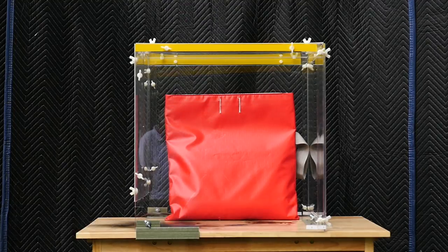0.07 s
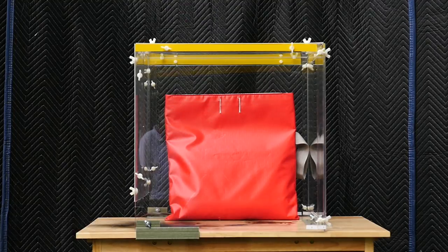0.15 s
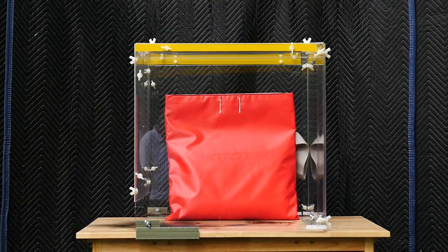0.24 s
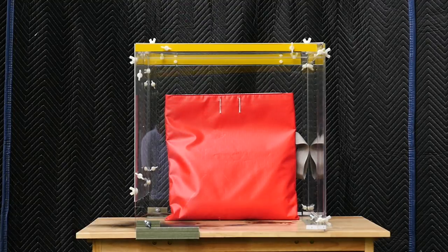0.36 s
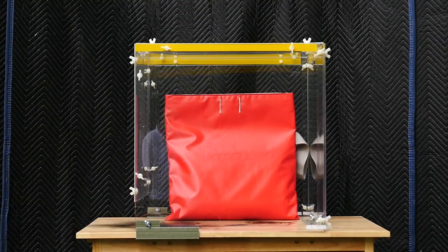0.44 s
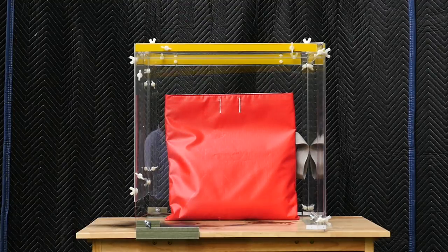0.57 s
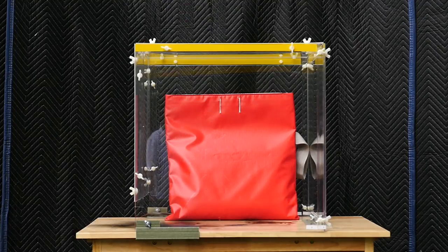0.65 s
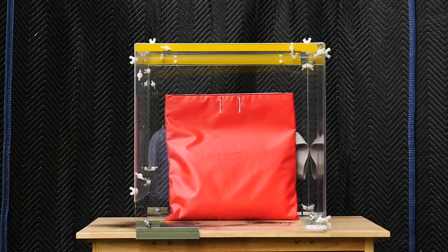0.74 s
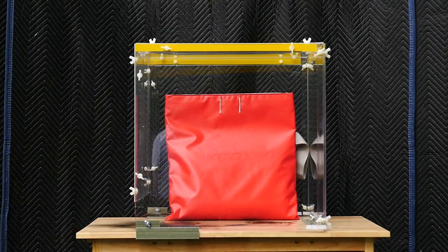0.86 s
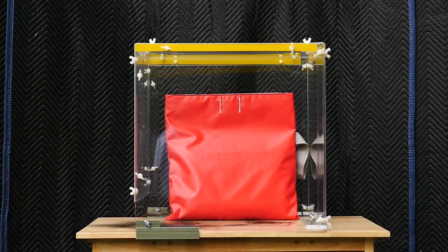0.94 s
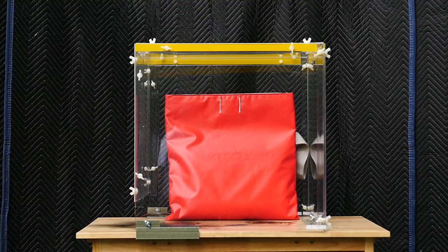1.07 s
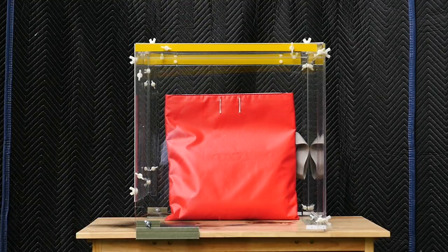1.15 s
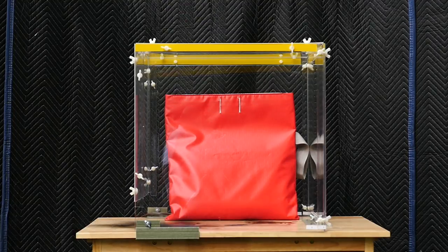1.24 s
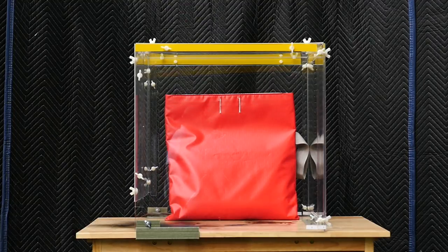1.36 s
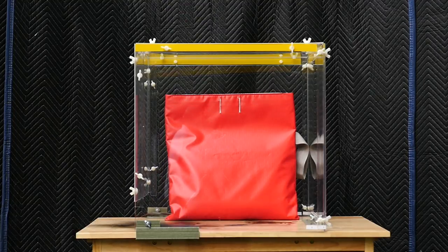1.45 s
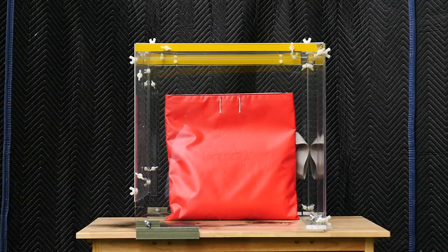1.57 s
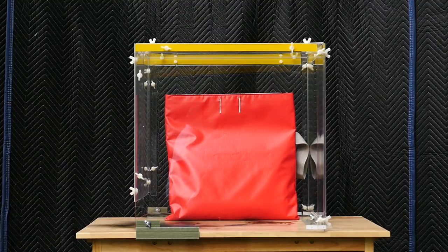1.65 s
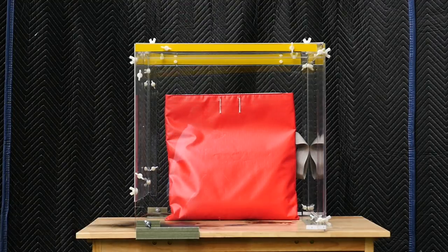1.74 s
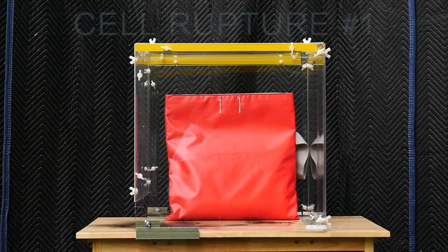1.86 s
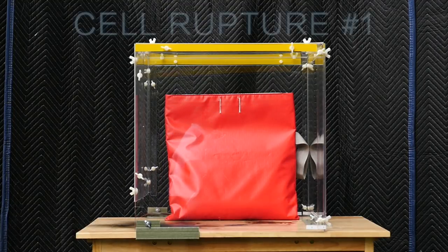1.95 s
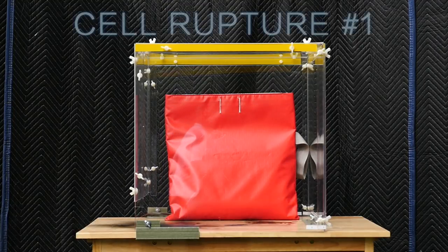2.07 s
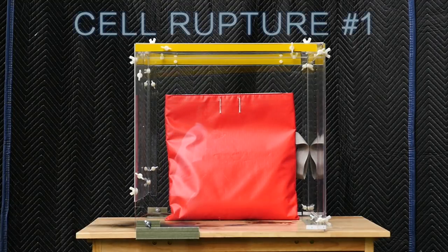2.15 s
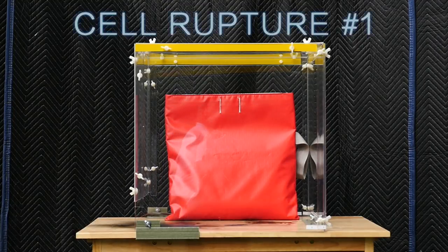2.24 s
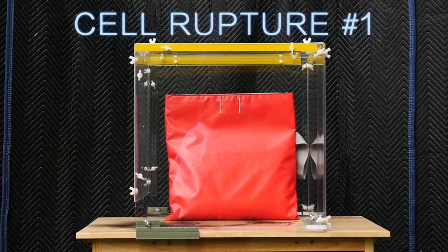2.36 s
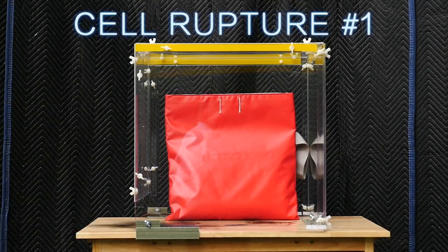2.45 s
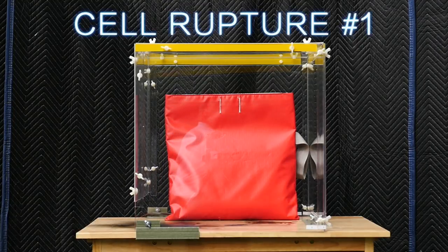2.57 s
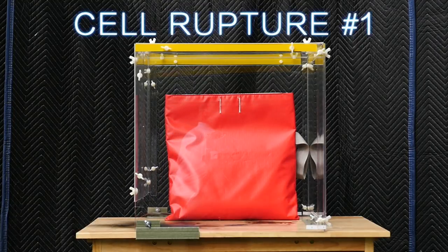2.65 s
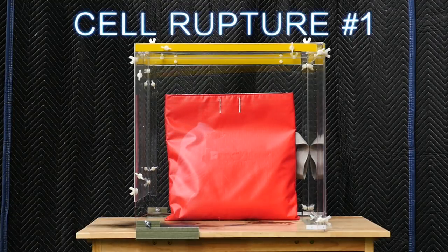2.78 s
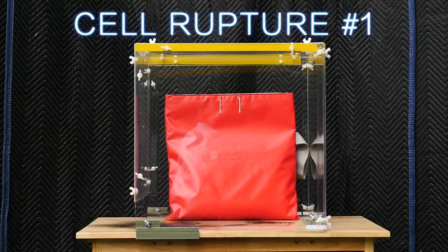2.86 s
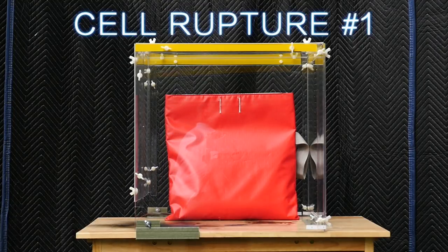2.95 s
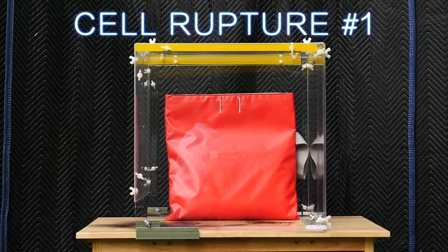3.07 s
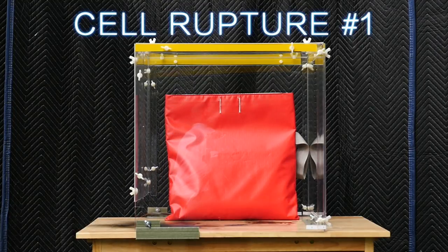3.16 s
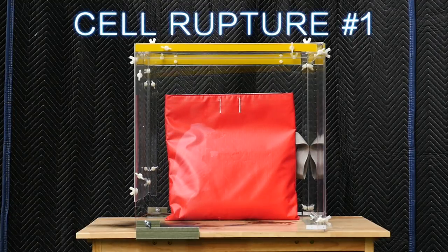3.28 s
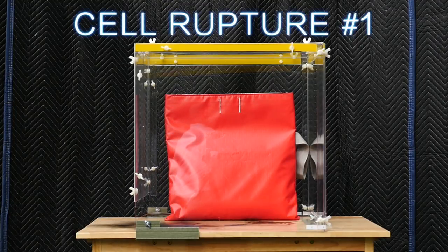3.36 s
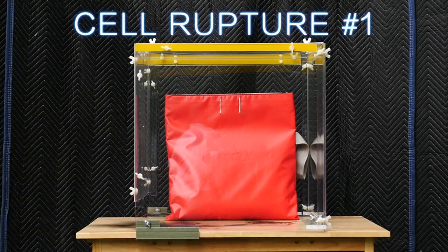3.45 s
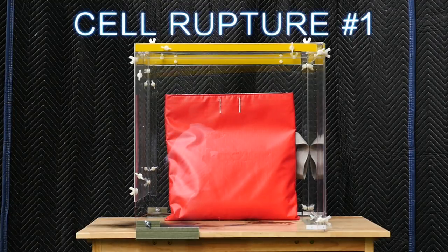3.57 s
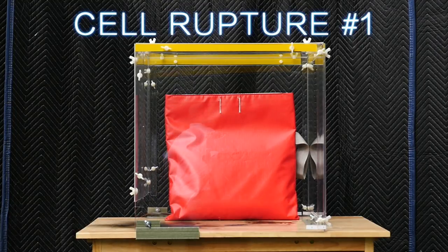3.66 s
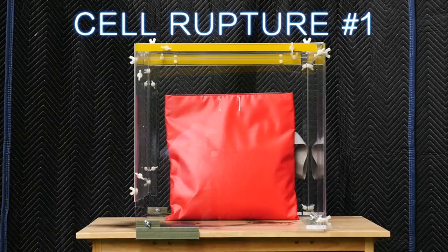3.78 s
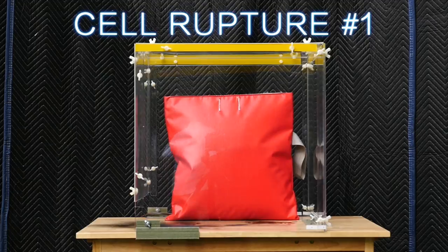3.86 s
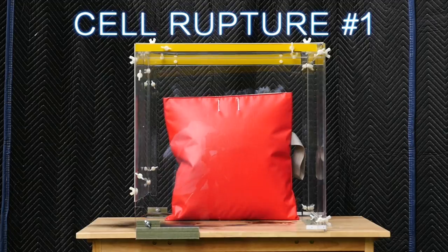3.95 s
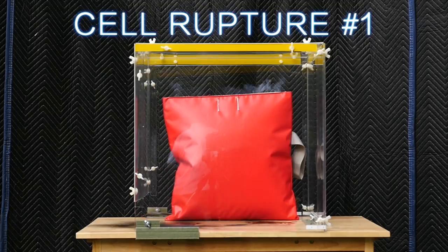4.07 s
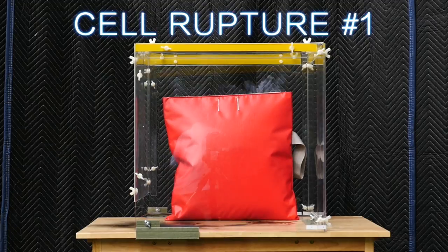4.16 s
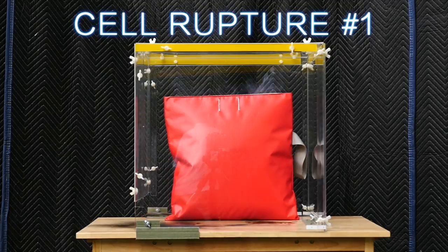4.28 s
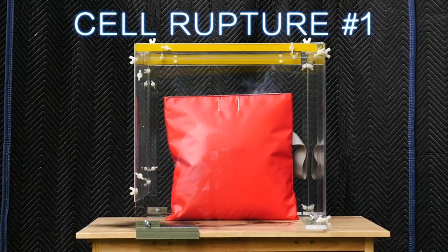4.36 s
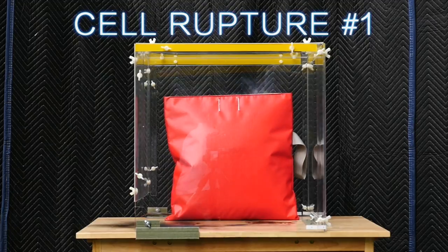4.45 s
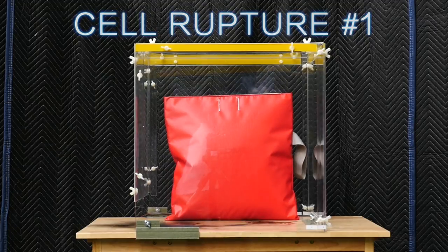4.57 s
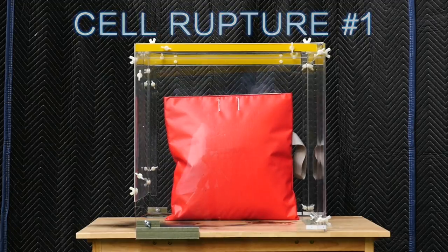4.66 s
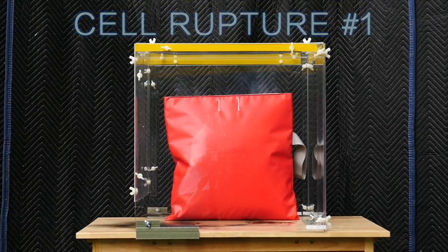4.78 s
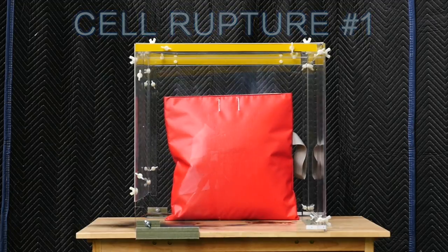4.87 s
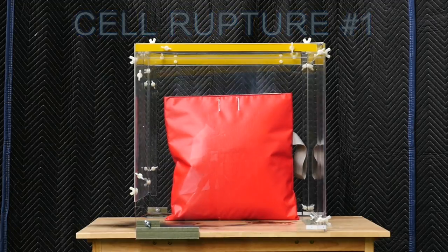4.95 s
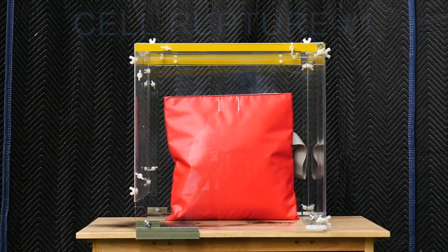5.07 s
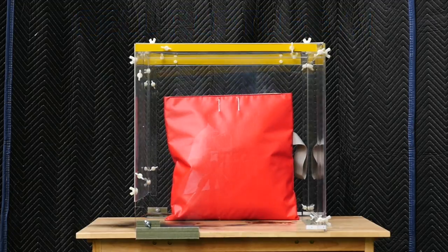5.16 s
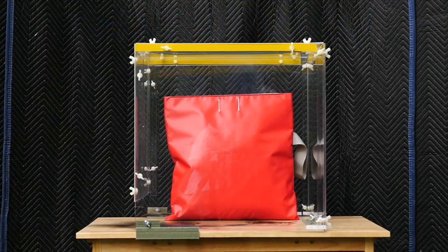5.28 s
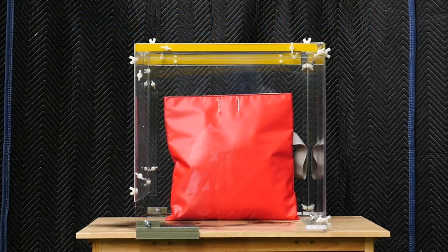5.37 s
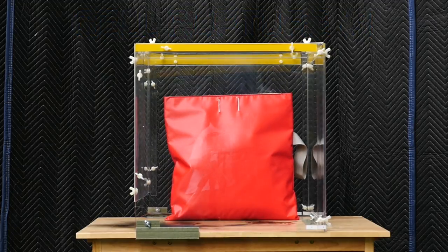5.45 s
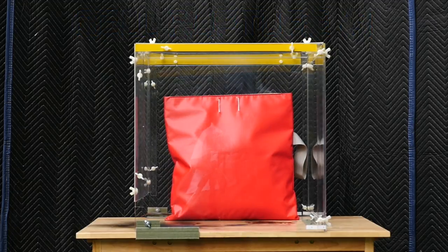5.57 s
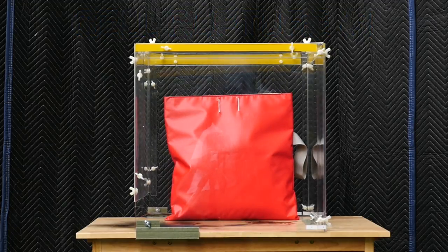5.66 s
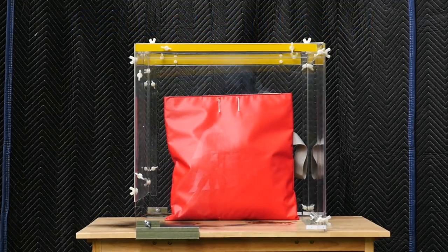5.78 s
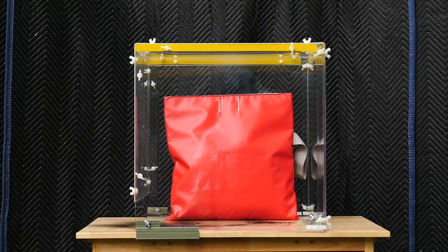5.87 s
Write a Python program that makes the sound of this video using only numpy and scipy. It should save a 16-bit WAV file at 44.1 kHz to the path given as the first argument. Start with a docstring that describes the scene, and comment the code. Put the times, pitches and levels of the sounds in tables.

```python
"""A battery cell bursts inside a fabric bag in a plastic test box: a rising hiss, one pop, then sputtering gas.
The gas is shaped noise that follows a flow curve; its puffs thump the bag and ring a drifting hollow tone.
The pop is a hard shove with a blast of noise; it overloads the recorder, whose gain ducks and creeps back.
Before and around it are dry ticks and a distant machine's hum, with gliding bird notes in echoes,
one bird far and one nearer, and faint insects made of narrow bands of noise."""
import sys
import numpy as np
from scipy import signal
from scipy.fft import rfft, irfft, next_fast_len
from scipy.io import wavfile
from scipy.ndimage import uniform_filter1d, map_coordinates

SR = 44100
rng = np.random.default_rng(int(sys.argv[2]) if len(sys.argv) > 2 else 0)


def wrap_up_sound(samples):
    """Save the sound to the file named by the first command line argument, as 16-bit audio."""
    columns = np.atleast_2d(samples).T
    # keep every value between -1 and 1, then stretch to whole-number steps
    tamed = np.clip(columns, -1, 1)
    steps = np.round(tamed * 32767).astype(np.int16)
    wavfile.write(sys.argv[1], SR, steps)


N = 261072
T = np.arange(N) / SR  # seconds


def amp(db):
    """Decibels to gain."""
    return 10 ** (np.asarray(db) / 20)


def unit(x):
    """Scaled to rms 1."""
    return x / np.sqrt(np.mean(x ** 2) + 1e-20)


def span(start_s, end_s):
    """The samples between two times."""
    return slice(int(start_s * SR), int(end_s * SR))


def wobble(rate):
    """A smooth random curve through rate random knots a second."""
    knots = rng.standard_normal(int(N * rate / SR) + 4)
    return map_coordinates(knots, [T * rate])


def filtered(x, response):
    """x times a response of frequency, padded so the end does not wrap round to the start."""
    m = next_fast_len(N + SR // 2)
    return irfft(rfft(x, m) * response(np.fft.rfftfreq(m, 1 / SR)), m)[:N]


def noise(spectrum):
    """Noise of rms 1 with a spectrum of (Hz, relative dB) points."""
    f, db = np.transpose(spectrum)

    def response(hz):
        return amp(np.interp(np.log(hz + 1), np.log(f), db))

    return unit(filtered(rng.standard_normal(N), response))


def narrow(centre_hz, half_width_hz):
    """A fuzzy tone of rms 1: noise through one resonance, at half amplitude half_width_hz off centre."""
    return unit(filtered(rng.standard_normal(N), lambda hz: 1 / (1 + ((hz - centre_hz) / half_width_hz) ** 2)))


def wavering(centre_hz, spread_hz, rate, flicker_db):
    """A tone of rms 1 whose pitch and strength drift through rate random knots a second."""
    phase = 2 * np.pi * np.cumsum(centre_hz + spread_hz * wobble(rate)) / SR
    return unit(np.sin(phase) * amp(flicker_db * wobble(rate)))


def echoes(x, t60, wet_db):
    """x plus a dense tail of reflections that falls 60 dB in t60 seconds."""
    t = T[:SR]
    tail = rng.standard_normal(len(t)) * amp(-60 * t / t60)
    return x + amp(wet_db) * signal.fftconvolve(x, tail / np.linalg.norm(tail))[:N]


def note(s, length, start_hz, end_hz, db, depth_hz=0):
    """One gliding bird note that starts quickly, with an optional fast sawtooth trill in its pitch."""
    out, now = np.zeros(N), span(s, s + length)
    age = T[now] - s
    u = np.clip(age / length, 0, 1)
    glide = start_hz + (end_hz - start_hz) * np.sin(u * np.pi / 2)
    pitch = glide + depth_hz * signal.sawtooth(2 * np.pi * 58 * age, .8)
    envelope = np.tanh(10 * u) * np.sqrt(1 - u)
    out[now] = amp(db) * envelope * np.sin(2 * np.pi * np.cumsum(pitch) / SR)
    return out


# Spectrum of the outdoor air at the microphone. Each row: frequency in Hz, relative level in dB.
AIR_SPECTRUM = [(18, -45.5), (35, -14), (55, -8.5), (75, -3), (98, -10.5), (125, -9), (190, -16.5),
                (260, -16), (300, -23.5), (380, -22.5), (560, -27.5), (1100, -28.5), (3200, -43),
                (6000, -48.5), (15500, -51)]
# Steady hums above the distant machine's drone. Each row: frequency in Hz, width in Hz, level in dB.
STEADY_HUMS = [(118.7, 16, -50), (248.4, 4.1, -63), (357.3, 2.8, -57.5), (388, 22, -63)]
# Brief swells of the low hum. Each row: centre in seconds, half length in seconds, level in dB.
HUM_SWELLS = [(0.602, 0.018, -31), (1.057, 0.082, -30.5)]
DRONE_DB, DRONE_SWAY_DB = -39.5, 1.4  # the drone's middle level and its slow unsteadiness


def background():
    """Outdoor air as shaped noise, with a distant machine's wavering drone and its steady hums."""
    sway = amp(DRONE_DB + DRONE_SWAY_DB * wobble(8))
    drone = sway * wavering(70, spread_hz=6.77, rate=30, flicker_db=5.0)
    swell = sum(amp(db) * np.exp(-((T - s) / half) ** 2) for s, half, db in HUM_SWELLS)
    swells = swell * wavering(60.5, spread_hz=6.6, rate=30, flicker_db=4.0)
    hums = sum(amp(db) * narrow(hz, width / 2) for hz, width, db in STEADY_HUMS)
    return amp(-43.0) * noise(AIR_SPECTRUM) + drone + swells + hums


BOUT_START_S, BOUT_EVERY_S, BOUT_S = 1.05, 2.12, 1.4  # one bout's start, the repeat time and the length


def insects():
    """High narrow noise bands: one insect chirps in loose pulses, one trills in bouts, a chorus stays behind."""
    cycle = 5.6 * T + .2 * wobble(3)  # about 5.6 pulses a second
    pulse = (.5 + .5 * np.cos(2 * np.pi * cycle)) ** 2 * amp(2 * wobble(6))
    chirps = amp(-74.5) * (0.58 + pulse) * narrow(9560, 160)
    in_bout = 1. * ((T - BOUT_START_S) % BOUT_EVERY_S < BOUT_S)
    trill = amp(-77) * uniform_filter1d(in_bout, size=4000) * narrow(8742, 55)
    chorus = amp(-73) * narrow(7800, 500)
    return chirps + trill + chorus


# A far bird's trilled notes. Each row: start in seconds, length in seconds, level in dB before lift and echoes.
SONG_NOTES = [(0.609, 0.085, -55.5), (0.916, .12, -54), (1.189, 0.098, -52.5)]
# Its soft rising chips after the song. Each row: start in seconds, level in dB before lift and echoes.
SONG_CHIPS = [(2.04, -64), (2.369, -64.5), (2.702, -66), (3.015, -65), (3.36, -70)]
# Spectrum of the buzz after its last trilled note. Each row: frequency in Hz, relative level in dB.
BUZZ_SPECTRUM = [(2600, -32), (3200, 2.5), (4200, -4), (4700, 1.5), (5100, -2), (5500, -15), (6500, -28)]
SONG_HZ, SONG_RISE_HZ, SONG_TRILL_DEPTH_HZ = 2867, 190, 115
# a soft low note leads into each repeat
GRACE_LEAD_S, GRACE_S, GRACE_HZ, GRACE_DRY_DB = 0.044, .083, 2110, -62.5
CHIP_S, CHIP_FROM_HZ, CHIP_TO_HZ, CHIP_TRILL_DEPTH_HZ = .052, 3190, 3410, 75
BUZZ_DELAY_S, BUZZ_ATTACK_S, BUZZ_HOLD_S = .1, 0.03, 0.58  # delay from the last note's start
BUZZ_DRY_DB, BUZZ_FADE_DB_PER_S = -63.5, 150


def far_bird():
    """Three trilled notes, a buzz of pulsing noise and then soft, regular chips, all in strong echoes."""
    song_end_hz = SONG_HZ + SONG_RISE_HZ
    trills = sum(note(s, length, SONG_HZ, song_end_hz, db, SONG_TRILL_DEPTH_HZ) for s, length, db in SONG_NOTES)
    graces = sum(note(s - GRACE_LEAD_S, GRACE_S, GRACE_HZ, GRACE_HZ, GRACE_DRY_DB, depth_hz=20)
                 for s, _, _ in SONG_NOTES[1:])
    chips = sum(note(s, CHIP_S, CHIP_FROM_HZ, CHIP_TO_HZ, db, CHIP_TRILL_DEPTH_HZ) for s, db in SONG_CHIPS)
    age = T - SONG_NOTES[-1][0] - BUZZ_DELAY_S
    fading_s = np.maximum(age - BUZZ_ATTACK_S - BUZZ_HOLD_S, 0)
    swell = np.clip(age / BUZZ_ATTACK_S, 0, 1) * amp(-BUZZ_FADE_DB_PER_S * fading_s)
    pulsing = 1 + 0.34 * np.sin(2 * np.pi * 48 * T)
    buzz = amp(BUZZ_DRY_DB) * swell * noise(BUZZ_SPECTRUM) * pulsing
    song = amp(3.5) * (trills + graces + chips) + buzz
    return echoes(song, t60=.85, wet_db=1)


# Ticks of the warming cell and bag.
# Each row: start in seconds, level in dB before the body's lift, brightness in dB (snap against knock).
CELL_TICKS = [(2.637, -37.5, -15.5), (2.644, -60, -1), (2.656, -50, -10), (3.442, -49, -7),
              (3.527, -52, 2.5), (3.568, -62, 7), (3.603, -52, -8.5), (4.166, -41.5, 4), (5.765, -57, 4)]


def ticks():
    """Small dry ticks, each a dull knock and a bright snap of noise under one abrupt, fading envelope."""
    knock, snap = np.zeros(N), np.zeros(N)
    for s, db, bright_db in CELL_TICKS:
        age = np.abs(T - s)
        crack, tail = amp(-60 * age / 0.011), 0.51 * amp(-60 * age / 0.14)
        fade = (T >= s) * amp(db) * (crack + tail)
        knock += fade
        snap += fade * amp(bright_db)
    body = noise([(80, -9.5), (300, 12.5), (900, -7), (2000, -43), (6000, -46.0)])
    bright = noise([(1000, -15.5), (3000, 0.0), (4500, -3), (7000, -13.5), (12000, -27.5)])
    return amp(3) * knock * body + snap * bright


# The gas flow leaks, surges as the cell bursts, surges again and runs out.
# Each row: time in seconds, flow in dB re full flow.
GAS_FLOW = [(2.8, -45), (3.0, -20.5), (3.2, -21), (3.35, -25), (3.5, -19.5), (3.78, -13.5), (3.88, -6.5),
            (4.0, 1), (4.3, -0.5), (4.6, -3), (4.75, 4.5), (4.88, 0), (5.15, -5), (5.4, -8), (5.92, -16)]


def follow(full_db, slope=1, shut_db=0, opening_s=1):
    """Gain that follows the flow, slope dB per dB, held shut_db lower until the burst opens the vent."""
    flow_db = np.interp(T, *np.transpose(GAS_FLOW))
    shut = np.exp(-np.maximum(T - BURST[0], 0) / opening_s)
    leaking = np.clip((T - GAS_FLOW[0][0]) / 0.15, 0, 1)
    return leaking * amp(full_db + slope * flow_db - shut_db * shut)


# Puffs of gas out of the vent.
# Each row: time in seconds, thump level in dB, half length in seconds, drive of rush, spit and tone in dB.
GAS_PUFFS = [(3.652, -36, 0.014, -49), (3.855, -35, .011, -37.5), (3.924, -38, 0.01, -44),
             (4.007, -6.5, 0.017, -31.5), (4.042, 3.5, .013, -31), (4.087, -16, 0.0044, -36),
             (4.139, 9, 0.023, -33), (4.214, 0.5, 0.035, -35), (4.259, 6, 0.01, -40),
             (4.312, 2.5, 0.0044, -51), (4.337, -11, 0.016, -32.5), (4.457, -3.5, 0.0096, -30),
             (4.51, -3.5, .006, -39), (4.586, -3.5, 0.014, -30.5), (4.62, -5, 0.024, -39.5),
             (4.702, -1.5, .006, -31.5), (4.724, 2, 0.012, -28), (4.814, -1, 0.0071, -25),
             (4.873, -22, 0.0084, -31.5), (4.969, -11, 0.0089, -28), (5.002, -10.5, 0.012, -36.5),
             (5.097, -4, 0.0085, -30.5), (5.136, -13, .014, -36), (5.205, -7.5, 0.0078, -29),
             (5.298, -17, 0.0062, -30.5), (5.364, -31, 0.0033, -38.5), (5.427, -30, .0095, -43.5)]
# Spectrum of the bag's flutter. Each row: frequency in Hz, relative level in dB.
FLUTTER_SPECTRUM = [(20, -28.5), (42, -8), (70, 11), (95, 2.5), (125, 5.5), (165, -1), (195, -18),
                    (260, -31), (380, -21.5), (600, -75.5)]
# Spectrum of the jet's dull rush. Each row: frequency in Hz, relative level in dB.
RUSH_SPECTRUM = [(100, -21), (230, 0.5), (370, 1.5), (520, 4), (650, 0), (800, -3.5), (1050, -12.5),
                 (1350, -12.5), (1900, -18.5), (2600, -29), (5000, -58)]
# Spectrum of the jet's hiss. Each row: frequency in Hz, relative level in dB.
HISS_SPECTRUM = [(700, -22.5), (1400, -4), (1900, -5), (2800, -1.5), (4000, -11.5), (5300, -16.5),
                 (6300, -20.5), (8000, -22.5), (11000, -51), (16000, -43)]
# Resonances of the plastic box that colour the jet. Each row: frequency in Hz, width in Hz, boost in dB.
BOX_PANELS = [(895, 26, 8.5), (1014, 23, 10.5), (1151, 75, 10), (1382, 20, 7), (1624, 9, 11), (1860, 34, 7)]
# Weaker resonances of the bag's hollow. Each row: frequency in Hz, width in Hz, relative level in dB.
BAG_HOLLOW = [(445.7, 14, 1), (488, 78, -2), (305.3, 4.7, -11)]
# drives at full flow, before the mix gains below
RUSH_DRIVE_DB, HISS_DRIVE_DB, TONE_DRIVE_DB = -34.5, -38.5, -22.5
HISS_SLOPE, HISS_SHUT_DB, WIDEN_S = 1.24, 9.5, 0.3  # the vent widens after the burst
FLUTTER_DB, FLUTTER_SLOPE, FLUTTER_SHUT_DB, FILL_S = -3.5, 1.3, 20, .03  # the bag fills after the burst
SETTLE_DB_PER_S = 15  # the flutter dies as the bag settles
LOCK_DELAY_S, LOCK_ATTACK_S = 0.13, 0.032  # the hollow tone starts once the bag is taut
TONE_FADE_DB_PER_S = 14.5  # and fades as the bag slackens
THUMP_HZ, THUMP_SAG = 131.8, 0.29  # a strong puff heaves more of the bag, so its thump is deeper


def venting():
    """A rough gas jet with puffs on top; each puff heaves the bag and drives its hollow tone harder."""
    rush = follow(RUSH_DRIVE_DB)
    hiss = follow(HISS_DRIVE_DB, HISS_SLOPE, HISS_SHUT_DB, WIDEN_S)
    taut_s = np.maximum(T - BURST[0] - LOCK_DELAY_S, 0)
    tone = np.minimum(taut_s / LOCK_ATTACK_S, 1) * amp(TONE_DRIVE_DB - TONE_FADE_DB_PER_S * taut_s)
    settling = amp(-SETTLE_DB_PER_S * np.maximum(T - BURST[0], 0))
    flutter = follow(FLUTTER_DB, FLUTTER_SLOPE, FLUTTER_SHUT_DB, FILL_S) * settling

    thumps, puffs = np.zeros(N), np.zeros(N)
    for s, thump_db, half, rush_db in GAS_PUFFS:
        now = span(s - 10 * half, s + 10 * half)
        u = T[now] - s
        hz = THUMP_HZ / (1 + THUMP_SAG * amp(thump_db))
        thumps[now] += amp(thump_db) * np.exp(-(u / half) ** 2) * np.cos(2 * np.pi * hz * u)
        # snaps open, closes slowly
        puffs[now] += amp(rush_db) * np.exp(-np.where(u < 0, (u / half) ** 6, (u / (2 * half)) ** 2))
    cloth = flutter * noise(FLUTTER_SPECTRUM) + thumps

    sputter = unit(amp(1.3 * wobble(45) + 2 * wobble(260)))
    dull = amp(4) * np.hypot(rush, puffs) * noise(RUSH_SPECTRUM)
    spit = amp(-16.5) * puffs * noise(HISS_SPECTRUM)
    # the hard walls keep the steady hiss bouncing
    ringing_hiss = echoes(sputter * hiss * noise(HISS_SPECTRUM), t60=.1, wet_db=6)
    jet = sputter * (dull + spit) + amp(-10.0) * ringing_hiss

    def panels(f):
        return amp(sum(db / (1 + (2 * (f - hz) / width) ** 2) for hz, width, db in BOX_PANELS))

    boxed = amp(-1.5) * filtered(jet, panels)
    # the flow locks on to the bag's hollow, with a fuzz of weaker resonances beside it
    locked = wavering(436, spread_hz=8, rate=50, flicker_db=3)
    fuzz = unit(sum(amp(db) * narrow(hz, width / 2) for hz, width, db in BAG_HOLLOW))
    ring = locked + amp(-4.5) * fuzz
    ring_drive = np.hypot(tone, amp(6) * puffs + amp(-13) * rush)
    return cloth + boxed + ring_drive * ring


# The burst. One row: time in seconds, thump level in dB before a 3 dB cut, thump pitch in Hz, blast level in dB.
BURST = (4.024, 5.8, 140, 1.2)
# Spectrum of the blast. Each row: frequency in Hz, relative level in dB.
BLAST_SPECTRUM = [(25, -21), (60, -12.5), (110, -2.5), (160, 7.5), (200, -4), (280, -1), (430, -15),
                  (700, -26), (1200, -38.5), (2500, -57), (6000, -83), (16000, -83)]
POP_RISE_S, POP_FALL_S = .012, .022


def pop():
    """The can tears open: one hard shove on the bag, a dull blast of gas and a short boom of the box."""
    s, thump_db, hz, blast_db = BURST
    u = T - s
    shove = amp(thump_db - 3) * np.exp(-(u / POP_RISE_S) ** 2) * np.cos(2 * np.pi * hz * u)
    swell = np.exp(-np.abs(u / np.where(u < 0, POP_RISE_S, POP_FALL_S)) ** (4 / 3))
    blast = amp(blast_db) * noise(BLAST_SPECTRUM)
    boom = amp(-14) * wavering(250, spread_hz=60, rate=130, flicker_db=1)
    return shove + swell * (blast + boom)


# A nearer bird's falling whistles. Each row: start in seconds, starting pitch in Hz.
FALLING_WHISTLES = [(5.421, 4640), (5.558, 4700), (5.64, 4180), (5.703, 4230), (5.765, 4070), (5.821, 4110),
                    (5.881, 4150)]
# Held notes that lead into the first whistles. Each row: start in seconds, length in seconds.
HELD_NOTES = [(5.398, .02), (5.524, .059)]
WHISTLE_S, WHISTLE_TO_HZ, WHISTLE_DRY_DB = .039, 3370, -53.5  # dry levels come before lift and echoes
HELD_HZ, HELD_DRY_DB = 4900, -58.5


def near_bird():
    """A quick run of falling whistles in light echoes, the first two slid into from a held note."""
    falls = sum(note(s, WHISTLE_S, hz, WHISTLE_TO_HZ, WHISTLE_DRY_DB) for s, hz in FALLING_WHISTLES)
    held = sum(note(s, length, HELD_HZ, HELD_HZ, HELD_DRY_DB) for s, length in HELD_NOTES)
    return amp(1.5) * echoes(falls + held, t60=.4, wet_db=-9)


def scene():
    """Everything at one microphone."""
    around = background() + insects() + far_bird() + near_bird()
    cell = ticks() + venting() + pop()
    return (around + cell)[None]


def gain_control(x, ceiling_db, release_db, attack):
    """Peaks over the ceiling pull the gain down a moment later; it returns by release_db a second."""
    over = np.maximum(20 * np.log10(np.abs(x) + 1e-9) - ceiling_db, 0)
    held = np.maximum.accumulate(over + release_db * T) - release_db * T
    late = np.interp(T - .004, T, held)  # reacts 4 ms late
    keep = np.exp(-1 / (attack * SR))
    cut_db = signal.lfilter([1 - keep], [1, -keep], late)
    return x * amp(-cut_db)


TOP_HZ = 15750  # the recorder's band limit


def record(dry):
    """The recorder ducks on the pop, clips what slips through and keeps nothing above its band limit."""
    ducked = gain_control(dry[0], ceiling_db=0, release_db=17, attack=.002)
    clipped = np.clip(ducked, -1, 1)
    return filtered(clipped, lambda hz: hz < TOP_HZ)[None]


dry = scene()
out = record(dry)
wrap_up_sound(out)
```